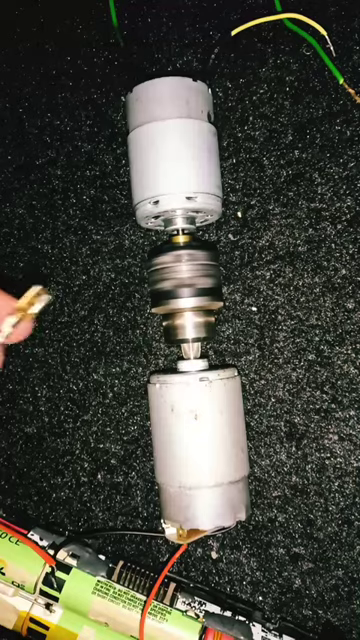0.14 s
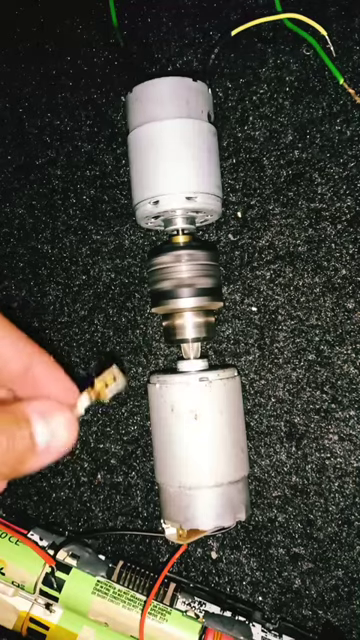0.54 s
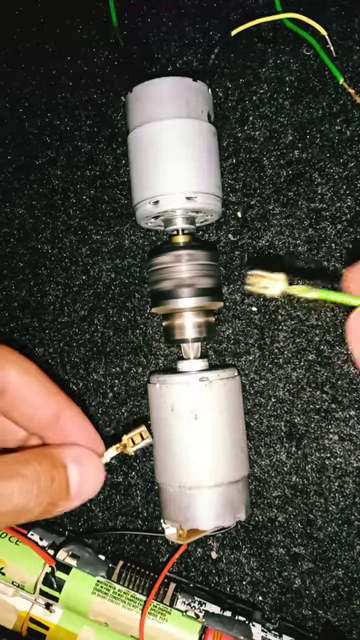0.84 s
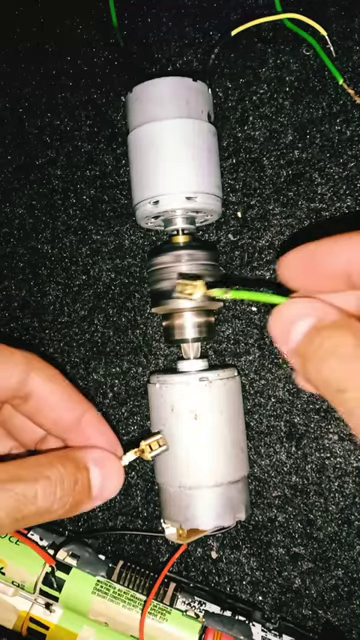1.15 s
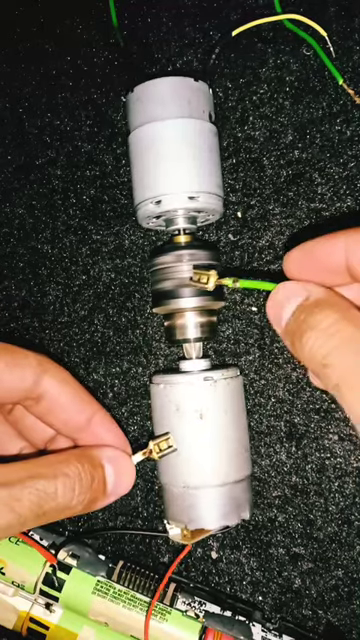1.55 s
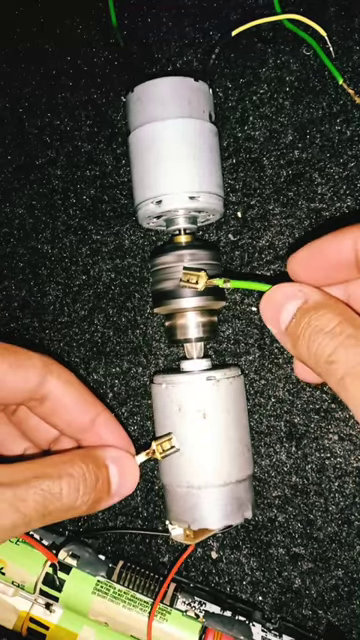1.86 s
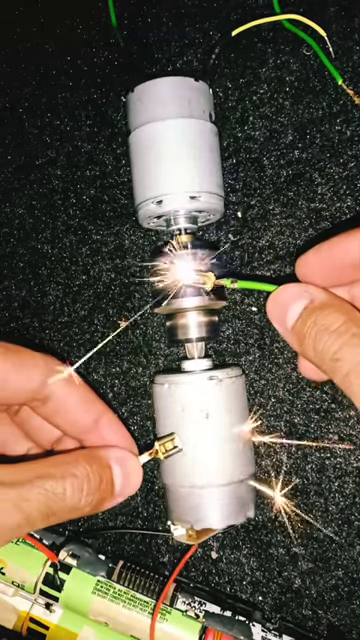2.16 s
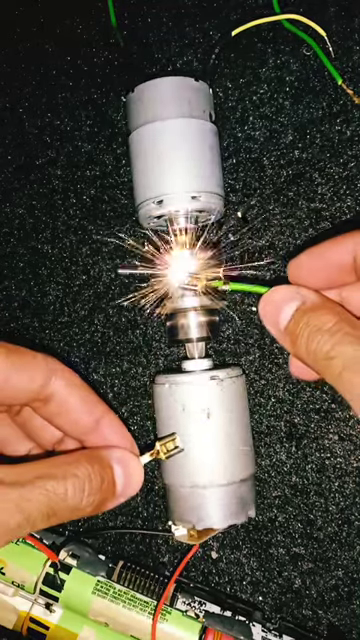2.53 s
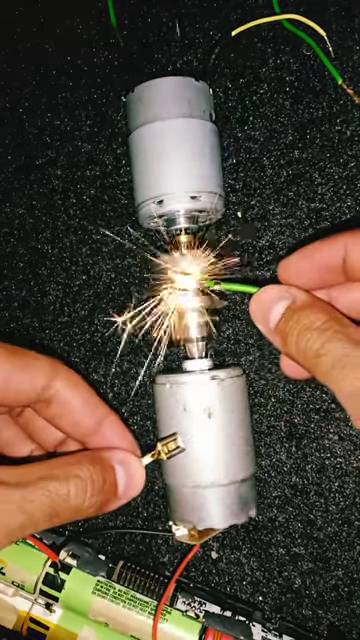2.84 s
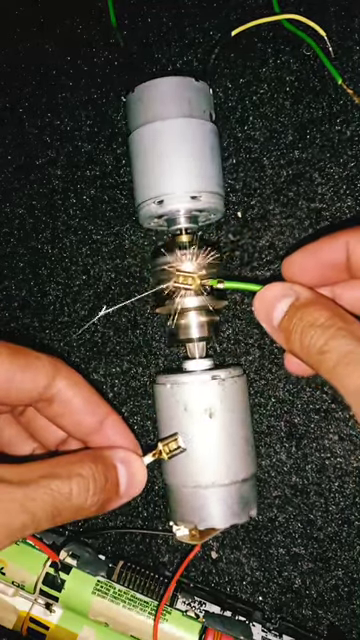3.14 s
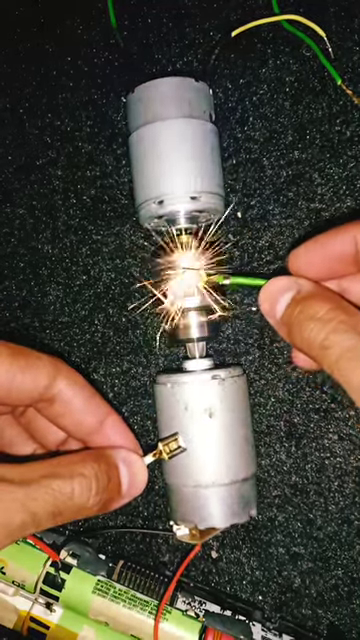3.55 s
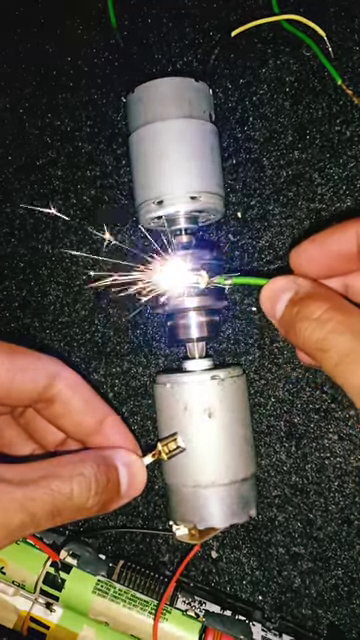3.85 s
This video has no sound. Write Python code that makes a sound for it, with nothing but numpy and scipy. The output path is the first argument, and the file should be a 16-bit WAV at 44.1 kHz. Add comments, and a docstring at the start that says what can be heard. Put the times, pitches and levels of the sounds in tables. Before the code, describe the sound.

Electrical short-circuit sparks: about two quiet seconds of low hum, faint finger rustle and tiny ticks, then loud crackling, buzzing bursts with metallic scraping and one heavy pop; close mono microphone at a small indoor bench.

```python
"""At first a quiet bench: a wavering low hum (a frequency-modulated sine), room air and fingers on the wires
(coloured noise and clicks), faint insects (pulsed narrow-band noise), small ticks and a scuff (resonances).
Then a bare connector is held against a spinning steel chuck and shorts out: the arc strikes again in every
half cycle of the supply, each loud strike a clump of impulse responses, while the connector scrapes on the
steel (clicks through resonances); a faint whine joins, and one big pop (a decaying pressure step)."""
import sys
import numpy as np
from scipy import signal
from scipy.fft import rfft, irfft
from scipy.io import wavfile
from scipy.ndimage import uniform_filter1d

SR = 44100
rng = np.random.default_rng(int(sys.argv[2]) if len(sys.argv) > 2 else 0)


def generate_wav(sig):
    """Save sig (samples, or channels by samples) to the path in sys.argv[1] as 16-bit PCM at SR."""
    pcm = np.round(np.clip(np.atleast_2d(sig).T, -1, 1) * 32767).astype(np.int16)
    wavfile.write(sys.argv[1], SR, pcm)


def ratio(d):
    """dB to gain"""
    e = np.asarray(d, float) / 20
    return 10 ** e


N = 176400


def evened(x):
    """Normalisation: the signal scaled to an rms of 1."""
    return x / np.sqrt(np.mean(x ** 2) + 1e-20)


def level(rows):
    """Envelope linear in decibels between (t/s, level/dB) rows: silent before the first, held after the last."""
    s, db = np.transpose(rows)
    return ratio(np.interp(np.arange(N) / SR, s, db, left=-200, right=db[-1]))


def causal(points, size=2048):
    """Minimum phase: the Hilbert transform of the log spectrum (f/Hz, level/dB) gives the phase; energy 1."""
    f, db = np.transpose(points)
    hz = abs(np.fft.fftfreq(8192, 1 / SR))
    log_gain = np.log(ratio(np.interp(np.log(hz + 1), np.log(f), db)))
    response = np.fft.ifft(np.exp(log_gain - 1j * signal.hilbert(log_gain).imag)).real[:size]
    return response / np.linalg.norm(response)


def resonate(x, hz, width):
    """Heterodyne resonance: shift to zero frequency, one-pole low-pass, shift back; gain 1 at its centre."""
    turn = np.exp(2j * np.pi * np.cumsum(hz * np.ones(len(x))) / SR)
    pole = np.exp(-np.pi * width / SR)
    return 2 * (turn * signal.lfilter([1 - pole], [1, -pole], x / turn)).real


def clicks(per_s, spread_db):
    """Poisson-like impulses: random times and signs, exponentially spread decibels, so a few are large."""
    hit, size, sign = rng.random((3, N))
    size_db = spread_db * np.minimum(-np.log(size + 1e-9), 4)
    return (hit < per_s / SR) * ratio(size_db) * np.sign(sign - .5)


def slow(smooth_s):
    """Low-pass random fluctuation: noise through two moving averages, rms 1."""
    span = int(smooth_s * SR)
    return evened(uniform_filter1d(uniform_filter1d(rng.standard_normal(N), span), span))


def fuzzy(hz, width):
    """Narrow-band noise: white noise through two equal resonances, rms 1."""
    return evened(resonate(resonate(rng.standard_normal(N), hz, width), hz, width))


DRIFT, DRIFT_S = .025, .06  # rms share of pitch; smoothing time, s


def wandering(x, hz, width):
    """Time-varying resonance: two stages whose centre and strength drift as the grip shifts."""
    hz = hz * (1 + DRIFT * slow(DRIFT_S))
    ringing = evened(resonate(resonate(x, hz, width), hz, 2 * width))
    return ratio(2 * slow(DRIFT_S)) * ringing


# Swell of the hum: t/s, level/dB
HUM_SWELL = [(0.1, -80), (0.13, -64.5), (0.39, -76), (0.61, -48.5), (0.7, -46.5), (0.84, -46),
             (0.97, -59.5), (1.08, -50.5), (1.21, -48.5), (1.48, -75.5), (1.6, -54.5), (1.86, -64),
             (2.02, -58.5), (2.54, -54.5), (2.7, -60), (2.72, -37), (2.78, -90), (2.95, -71), (3.04, -60.5),
             (3.61, -74), (3.71, -56.5), (3.86, -97), (3.91, -68), (4.0, -87)]
# Faint flickering tones above the hum: f/Hz, mean level/dB with the hum at HUM_MID_DB, exponent on the hum's swell
FAINT_TONES = [(115.4, -75, 0.4), (242, -75.5, 0.12)]
HUM_HZ, HUM_WAVER_HZ, HUM_MID_DB = 58.6, .7, -55  # the waver is rms
HUM_FUZZ_DB, HUM_FUZZ_HZ = -9, 22  # against the hum; bandwidth
RUMBLE_HZ, RUMBLE_WIDTH_HZ, RUMBLE_DB = 34, 18, -29  # level against the hum


def hum():
    """Frequency modulation: a low tone swells and wavers, with narrow-band rumble and faint flickering tones."""
    swell = level(HUM_SWELL)
    tone = np.sqrt(2) * np.sin(2 * np.pi * np.cumsum(HUM_HZ + HUM_WAVER_HZ * slow(0.16)) / SR)
    fuzz = ratio(HUM_FUZZ_DB) * fuzzy(HUM_HZ, HUM_FUZZ_HZ)
    rumble = ratio(RUMBLE_DB) * fuzzy(RUMBLE_HZ, RUMBLE_WIDTH_HZ)
    faint = np.zeros(N)
    for hz, db, share in FAINT_TONES:
        strength = ratio(db + 3.4 * slow(0.031)) * (swell / ratio(HUM_MID_DB)) ** share
        faint += strength * np.sin(2 * np.pi * np.cumsum(hz + 2.5 * slow(0.049)) / SR)
    return swell * (tone + fuzz + rumble) + faint


# Spectrum of the room air: f/Hz, relative level/dB per Hz
AIR_COLOUR = [(44, -14), (75, -10.5), (88, -14.5), (123, -12.5), (146, -12.5), (214, -15), (245, -20),
              (320, -25.5), (499, -21.5), (597, -37), (746, -25), (872, -31.5), (1170, -24.5), (1590, -63),
              (1780, -34), (3640, -27), (5810, -61.5), (13000, -45.5), (15500, -75)]
AIR_DB, AIR_SWELL_DB = -69, 1.2  # the swell is rms


def air():
    """Filtered noise: room air as white noise through a fixed spectrum, swelling slowly."""
    noise = signal.oaconvolve(rng.standard_normal(N), causal(AIR_COLOUR, size=4096))[:N]
    return ratio(AIR_DB + AIR_SWELL_DB * slow(0.27)) * noise


# Loudness of fingers and wires: t/s, level/dB
RUSTLE = [(.1, -70), (.2, -63.5), (.28, -63), (.31, -57), (.35, -57.5), (.5, -60), (.54, -64), (.6, -63.5),
          (.75, -64.5), (.87, -69), (1.09, -68.5), (1.3, -67), (1.49, -70.5), (2.2, -74.5)]
# Spectrum of the rustle: f/Hz, relative level/dB per Hz
RUSTLE_COLOUR = [(180, -48), (300, -6.5), (821, -7.5), (1300, -7.5), (1590, -8), (2560, -8.5), (3750, -9),
                 (5850, -31), (7750, -20), (13400, -39), (15500, -53)]
RUSTLE_FLICKER_DB = 1.3  # rms


def rustle():
    """Superposed impacts: dense random clicks of fingers and wires, coloured and flickering in level."""
    contacts = signal.oaconvolve(evened(clicks(6000, 3.0)), causal(RUSTLE_COLOUR))[:N]
    return level(RUSTLE) * ratio(RUSTLE_FLICKER_DB * slow(0.025)) * contacts


# Insects: f/Hz, width/Hz, level/dB at the loudest, pulses per s, chirps per s, chirp depth 0-1,
# loudest t/s, loss in dB per s away from it
INSECTS = [(5310, 52, -79.5, 85, 22, 0, 0.59, 17), (4970, 220, -89.5, 150, 29, 0.1, 1.5, 2),
           (13160, 840, -83, 140, 19, 0.26, 0.62, 4.5)]


def insects():
    """Amplitude modulation: narrow-band noise in fast pulses, throbbing in short chirps."""
    t, out = np.arange(N) / SR, np.zeros(N)
    for hz, width, db, pulses, chirps, depth, peak_s, fade_db in INSECTS:
        pulse = (.5 + .5 * np.cos(2 * np.pi * pulses * t)) ** 3
        chirp = 1 + depth * np.cos(2 * np.pi * chirps * t)
        buzz = resonate(resonate(pulse * chirp * rng.standard_normal(N), hz, width), hz, width * 2)
        out += ratio(db - fade_db * abs(t - peak_s)) * evened(buzz)
    return out


# Ticks of connector and wire: t/s, level/dB before TICK_DB, ring f/Hz
TICKS = [(0.316, -41, 2900), (0.323, -38.5, 3000), (0.341, -43, 1590), (0.379, -36, 1630),
         (1.264, -56, 1350), (1.744, -61, 3580), (2.101, -62, 1520)]
# Spectrum of a tick's crack: f/Hz, relative level/dB per Hz
TICK_COLOUR = [(300, -53), (900, 5), (1600, -1), (3200, 1), (4600, -7.5), (5800, -16), (7500, -8),
               (9500, -19), (15500, -50)]
TICK_T60, TICK_WIDTH_HZ = 0.038, 310  # decay of the ring, s; width of its narrower stage
TICK_NOISE_DB, TICK_DB = -1.5, -5  # crack before its filter; trim of all ticks


def ticks():
    """Damped resonance: each tick of connector or wire is a decaying ring with a coloured crack."""
    out, t = np.zeros(N), np.arange(2048) / SR
    for s, db, hz in TICKS:
        noise = rng.standard_normal(2048)
        crack = np.convolve(noise * ratio(-90 * t / TICK_T60), causal(TICK_COLOUR))[:2048]
        ring = evened(resonate(resonate(noise, hz, TICK_WIDTH_HZ), hz, 10 * TICK_WIDTH_HZ))
        tick = ring * ratio(-60 * t / TICK_T60) + ratio(TICK_NOISE_DB) * crack
        out[round(s * SR):][:2048] += ratio(db + TICK_DB) * tick
    return out


# Loudness of the scuff: t/s, level/dB
SCUFF = [(.58, -94), (.63, -59), (.66, -55.5), (.72, -61.5), (.77, -86), (.8, -120)]
# Resonances of the scuff: f/Hz, width/Hz, relative level/dB per Hz of width
SCUFF_BANDS = [(1130, 43, 1), (1610, 250, 3), (2080, 48, 3), (2790, 73, -0.5), (3820, 74, 2),
               (7700, 1600, -21.5)]


def scuff():
    """Friction noise: a finger slides along the wire sleeve and excites drifting resonances."""
    bands = sum(ratio(db) * np.sqrt(width) * wandering(rng.standard_normal(N), hz, width)
                for hz, width, db in SCUFF_BANDS)
    return level(SCUFF) * evened(bands)


STRIKES_PER_S, STRIKE_PHASE = 100, .76  # phase in cycles of the strikes
STRIKE_WIDTHS, STRIKE_SCATTER, STRIKE_SPREAD_DB = (.015, .08), .09, 1.5  # cycles, rms cycles, rms dB


def burning():
    """Periodic reignition: the arc strikes every half cycle, a little early or late, short or long, weak or strong."""
    turn = np.arange(N) / SR * STRIKES_PER_S - STRIKE_PHASE
    cycle = np.round(turn).astype(int) + 1
    early, long, strong = rng.standard_normal((cycle.max() + 1, 3))[cycle].T
    width = np.interp(abs(long), [0, 1.5], STRIKE_WIDTHS)
    offset = turn - cycle + 1 - STRIKE_SCATTER * early
    gate = np.exp(-.5 * (offset / width) ** 2) / np.sqrt(width)
    return gate * ratio(STRIKE_SPREAD_DB * strong)


# Spectrum of one snap: f/Hz, relative level/dB per Hz
SNAP_COLOUR = [(180, -78.5), (300, -16), (620, -22), (1000, -14), (1850, -13), (2570, -6), (2790, -9),
               (3240, 2), (3880, -6), (4890, -7.5), (6370, -31), (7600, -9), (9950, -23.5), (12300, -15),
               (13600, -12.5), (15500, -20)]
# The microphone port lets the treble in late: f/Hz, delay/ms
PORT_LAG = [(6000, 0), (7400, 1.2), (8600, 1.4), (10500, .2)]
FIZZ_MS, COLOUR_SPREAD_DB = .12, 2  # decay of the crack; spread of its colour
ECHO_MS, ECHO_DB = 1.35, -9  # off the motor can
BENCH_T60, BENCH_DB, BENCH_GAP_MS = .035, -14, 1.5  # scatter: decay in s, level, delay
PORT_HZ, PORT_T60, PORT_DB, PORT_RISE_MS = 7950, .015, -12.5, 2  # ringing of the port, decay in s


def snap():
    """Impulse response: a sharp crack, its echo, scatter off the bench, and late, ringing treble."""
    t, hz = np.arange(2048) / SR, np.fft.rfftfreq(8192, 1 / SR)
    first, scatter = rng.standard_normal((2, 2048))
    fizz = np.sign(first) * np.exp(-t * 1000 / FIZZ_MS) * (abs(first) > .9)
    fizz[0] = 2
    echo_lag = round(ECHO_MS / 1000 * SR * (1 + first[0] / 20))
    fizz += ratio(ECHO_DB) * np.roll(fizz, echo_lag)
    scatter *= ratio(-60 * t / BENCH_T60) * (t > BENCH_GAP_MS / 1000)
    paths = fizz / np.linalg.norm(fizz) + ratio(BENCH_DB) * scatter / np.linalg.norm(scatter)
    colour = [(f, db + COLOUR_SPREAD_DB * rng.uniform(-0.058, 1)) for f, db in SNAP_COLOUR]
    # the phase is the group delay summed over frequency
    lag = np.cumsum(np.interp(hz, *np.transpose(PORT_LAG))) / 1000 * hz[1]
    spectrum = rfft(causal(colour), 8192) * rfft(paths, 8192) * np.exp(-2j * np.pi * lag)
    crack = irfft(spectrum)[:2048]
    rise = np.minimum(t * 1000 / PORT_RISE_MS, 1) ** 2
    ring = rise * ratio(-60 * t / PORT_T60) * np.sin(2 * np.pi * PORT_HZ * (1 + first[1] / 40) * t)
    return crack / np.linalg.norm(crack) + ratio(PORT_DB) * ring / np.linalg.norm(ring)


SNAP_KINDS = 8


def heard(drive):
    """Convolution: every stretch of 147 samples of the arc gets one of the kinds of snap."""
    kind = np.repeat(rng.integers(0, SNAP_KINDS, N // 147 + 1), 147)[:N]
    return sum(signal.oaconvolve(drive * (kind == k), snap())[:N] for k in range(SNAP_KINDS))


# Loud strikes: t/s, length/ms, level/dB before SPARK_DB and growth with length, air puff level/dB before PUFF_DB
SPARKS = [(2.2186, 1.68, -21, -63), (2.2279, 0.45, -16.5, -44), (2.249, 1.65, -25, -62),
          (2.284, 1.1, -30, -58), (2.3013, 0.11, -29, -53), (2.3083, 2.26, -18.5, -37),
          (2.3268, 0.36, -24.5, -38), (2.337, 3.5, -26, -66), (2.3476, 2.9, -24.5, -38),
          (2.3571, 2.1, -26, -41), (2.379, 0.16, -27, -62), (2.396, 1.95, -27.5, -51),
          (2.41, 0.2, -20.5, -50), (2.4465, 0.38, -27, -68), (2.479, 1.16, -26.5, -72),
          (2.4873, 1.65, -24, -72), (2.5, 0.15, -22.5, -70), (2.5369, 2.97, -24, -56),
          (2.5594, 0.71, -17.5, -38), (2.5685, 0.14, -19, -40.5), (2.59, 0.71, -30, -63),
          (2.598, 0.55, -22, -51), (2.618, 2.4, -23.5, -53), (2.6366, 1.94, -21.5, -42),
          (2.6583, 2.5, -34, -58), (2.667, 0.62, -24, -47), (2.677, 0.44, -22.5, -43),
          (2.6852, 1.1, -27, -43), (2.7589, 1.6, -25, -37.5), (2.805, 2.43, -20.5, -28.5),
          (2.829, 0.12, -13.5, -27.5), (2.8594, 0.4, -18.5, -31.5), (2.9175, 0.15, -17, -33),
          (2.9276, 2.7, -18.5, -29.5), (2.98, 0.42, -26, -45), (3.0582, 0.24, -22.5, -67),
          (3.066, 0.11, -20.5, -69), (3.078, 0.17, -27, -69), (3.0975, 1.67, -25.5, -68),
          (3.117, 1.4, -27, -68), (3.1567, 1.8, -26.5, -73), (3.186, 0.65, -17, -56),
          (3.2475, 1.5, -33.5, -70), (3.3726, 3.0, -25, -53), (3.4828, 1.26, -26, -66),
          (3.578, 0.15, -38, -33), (3.597, 0.86, -22, -33.5), (3.607, 2.2, -22.5, -39),
          (3.6162, 3.2, -23.5, -39), (3.6759, 1.3, -20, -40), (3.686, 2.8, -21.5, -67),
          (3.6954, 3, -20.5, -49), (3.7059, 2.03, -16, -62), (3.7135, 3.6, -24, -38.5),
          (3.7344, 3.2, -22, -51), (3.746, 0.4, -29, -57), (3.7562, 0.61, -14, -33),
          (3.7774, 1.14, -22, -44), (3.7847, 2.5, -26, -45), (3.7967, 2, -20, -46),
          (3.8156, 0.2, -16.5, -48), (3.8368, 0.24, -16, -40), (3.8653, 0.31, -16.5, -55),
          (3.8757, 1.3, -18, -46), (3.887, 0.38, -25, -67), (3.8989, 0.27, -16.5, -52),
          (3.9046, 3.1, -21.5, -67), (3.9146, 3.2, -23, -59), (3.9287, 0.76, -17, -65),
          (3.935, 4.6, -16.5, -62), (3.944, 3.3, -21, -59), (3.9559, 3.06, -16.5, -60),
          (3.965, 2.5, -26, -42), (3.9742, 3.8, -21, -40), (3.9846, 3.1, -18, -37),
          (3.9937, 2.5, -28.5, -35.5)]
# Small strikes: t/s, level/dB
ARC = [(2.2, -56), (2.232, -72), (2.243, -54), (2.256, -40), (2.3, -39.5), (2.45, -38.5), (2.465, -50),
       (2.5, -51), (2.518, -48), (2.535, -42.5), (2.69, -39), (2.712, -33), (2.722, -52), (2.75, -47.5),
       (2.81, -37), (2.87, -44), (2.9, -41), (2.95, -48), (3.05, -45.5), (3.22, -47.5), (3.42, -45),
       (3.6, -42.5), (4.0, -38.5)]
# Sizzle between the small strikes, before the gate of the strikes is added: t/s, level/dB
BETWEEN = [(2.2, -6), (2.9, -7), (3.05, -2), (3.5, 0), (3.65, -1)]
SNAPS_PER_MS, SNAP_SPREAD_DB, SPARK_DB = 1.6, 4, -7  # snaps are spread over twice SNAP_SPREAD_DB
ARC_SNAPS_PER_S, ARC_SPREAD_DB = 4000, 2.2
PUFF_HZ, PUFF_MS, PUFF_DB = 247, 0.44, 3  # puff: pitch, rise time, trim


def sparks():
    """Impulse trains: each loud strike opens and ends with a snap, random ones between, and pushes a puff of air."""
    drive, push = np.zeros(N + SR), np.zeros(N)
    draws = rng.random((len(SPARKS), 3, 12))
    for (s, ms, db, puff_db), (when, size, sign) in zip(SPARKS, draws):
        when = np.concatenate([[0, 1], when[2:]])
        size = size * np.where(when == 0, .5, 1)  # the opening snap tends to be strong
        used = np.arange(12) < 1.5 + ms * SNAPS_PER_MS
        size = ratio(-SNAP_SPREAD_DB * 2 * size) * used * np.sign(sign - .6)
        size *= ratio(db) * (1 + ms) ** .5 / np.linalg.norm(size)  # longer strikes carry more energy
        np.add.at(drive, np.round((s + when * ms / 1000) * SR).astype(int), size)
        push[round(s * SR)] = ratio(puff_db)
    small = evened(clicks(ARC_SNAPS_PER_S, ARC_SPREAD_DB) * (burning() + level(BETWEEN)))
    drive = ratio(SPARK_DB) * np.sqrt(SR / 1000) * drive[:N] + level(ARC) * small
    u = np.arange(1000) / SR / (PUFF_MS / 1000)  # time in units of the rise
    puff = u * np.exp(1 - u) * np.cos(2 * np.pi * PUFF_HZ * PUFF_MS / 1000 * u)
    return heard(drive) + ratio(PUFF_DB) * signal.oaconvolve(push, puff)[:N]


# Loudness of the scrape: t/s, level/dB
SCRAPE = [(2.2, -89), (2.214, -74), (2.344, -46.5), (2.53, -54.5), (2.576, -43.5), (2.69, -42),
          (2.706, -35.5), (2.72, -50), (2.81, -38), (2.866, -54.5), (2.91, -41.5), (3.448, -41.5),
          (3.728, -41.5), (3.864, -48), (3.874, -40.5), (3.988, -44), (4.0, -61)]
# Resonances of the steel: f/Hz, width/Hz of the narrower stage, relative level/dB
STEEL = [(509, 188, -11), (775, 170, 5), (769, 44, -7), (947, 127, -0.5), (1233, 360, -5), (2177, 370, 1.5),
         (11000, 7400, -3)]
SCRAPES_PER_S, SCRAPE_SPREAD_DB, SCRAPE_THROB = 2500, 3.5, 0.043  # throb: depth at the rate of the strikes


def scrape():
    """Source and filter: the connector drags over the turning steel and rings its broad resonances."""
    turn = np.arange(N) / SR * STRIKES_PER_S - STRIKE_PHASE
    throb = 1 + SCRAPE_THROB * np.cos(2 * np.pi * turn)
    drive = clicks(SCRAPES_PER_S, SCRAPE_SPREAD_DB) * throb
    # neighbouring resonances alternate in sign
    body = sum((-1) ** k * ratio(db) * wandering(drive, hz, width) for k, (hz, width, db) in enumerate(STEEL))
    return level(SCRAPE) * evened(body)


# A faint whine in the arc: t/s, level/dB
WHINE = [(2.3, -85), (2.44, -67), (2.82, -68), (2.9, -85)]
WHINE_HZ, WHINE_WIDTH_HZ = 9900, 130


def whine():
    """Narrow-band noise: a band slender enough to be heard as a faint, rough pitch."""
    return level(WHINE) * fuzzy(WHINE_HZ, WHINE_WIDTH_HZ)


POP_S, POP_DB, POP_MS = 2.70597, -6, 1.55  # start, level and decay of the step
POP_DIP_DB, POP_DIP_MS = -11, .2
POP_CUT_HZ, POP_TOP_HZ = 84, 6000


def pop():
    """Pressure step: it sinks away after a tiny dip, bent by the low cut of the microphone."""
    t = np.arange(N) / SR - POP_S
    step = ratio(POP_DB) * (t > 0) * np.exp(-abs(t) * 1000 / POP_MS)
    dip = ratio(POP_DIP_DB) * np.exp(-((t * 1000 + POP_DIP_MS / 2) / (POP_DIP_MS / 3)) ** 2)
    band = signal.butter(2, (POP_CUT_HZ, POP_TOP_HZ), "band", fs=SR, output="sos")
    return signal.sosfilt(band, step - dip)


def scene():
    """Superposition: the pressures of all sources add, in one channel."""
    bench = hum() + air() + rustle() + insects() + ticks() + scuff()
    short_circuit = sparks() + scrape() + whine() + pop()
    return (bench + short_circuit)[None]


def top_cut(x):
    """Nothing passes above the cut-off."""
    return signal.sosfilt(signal.butter(12, 15690, fs=SR, output="sos"), x)


EDGE_HZ, START_S = 14470, 0.1


def record(dry):
    """Band limitation: a linear-phase low-pass; the sound starts after a short silence."""
    limited = signal.oaconvolve(dry, signal.firwin(101, EDGE_HZ, fs=SR)[None], "same")
    fade_in = np.clip((np.arange(N) / SR - START_S) / 0.0019, 0, 1)  # over 1.9 ms
    return top_cut(limited * fade_in)


dry = scene()
out = record(dry)
generate_wav(out)
```